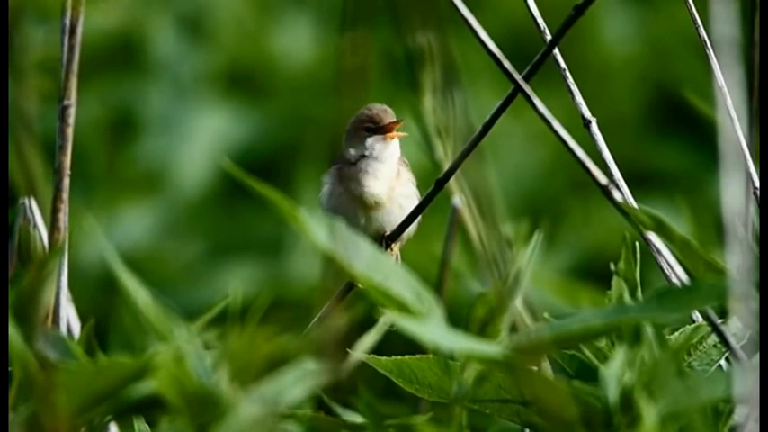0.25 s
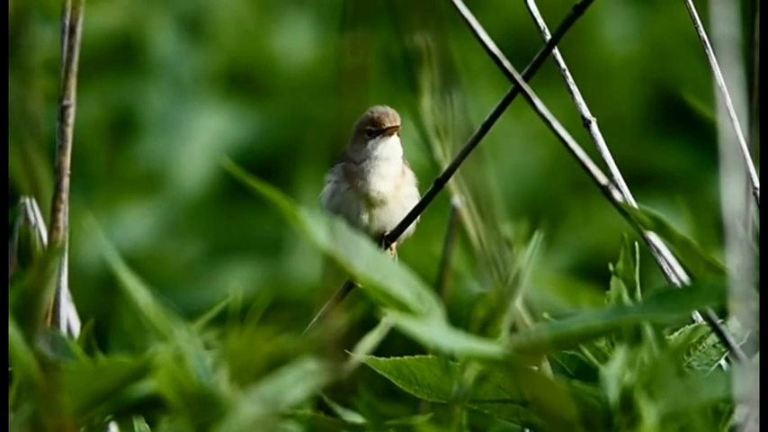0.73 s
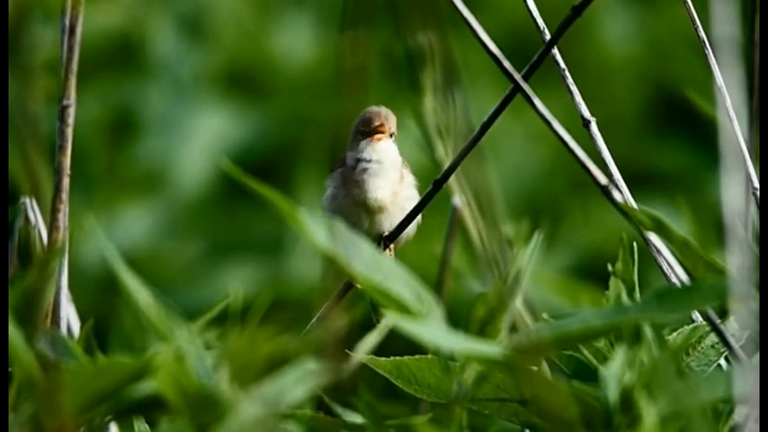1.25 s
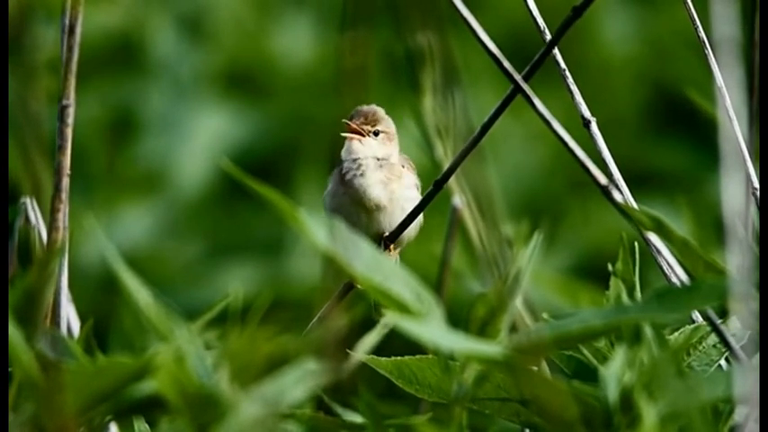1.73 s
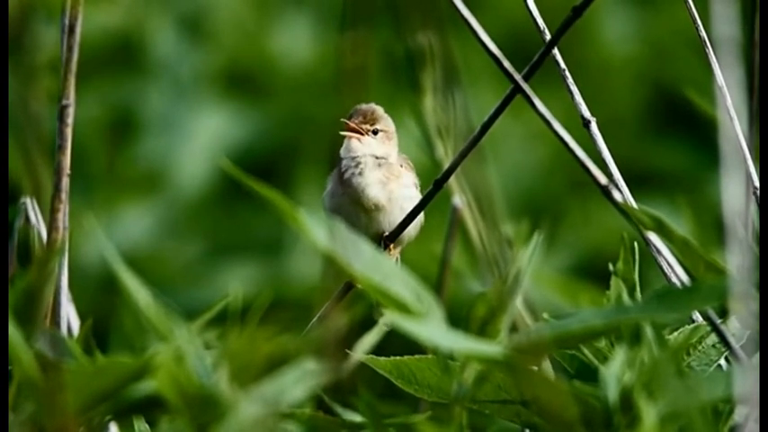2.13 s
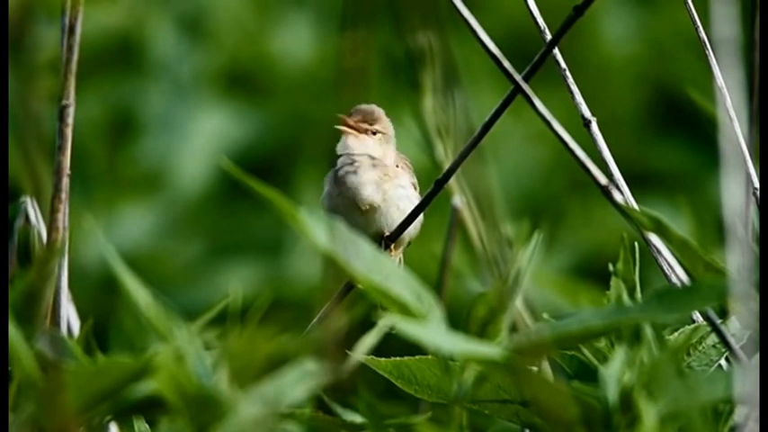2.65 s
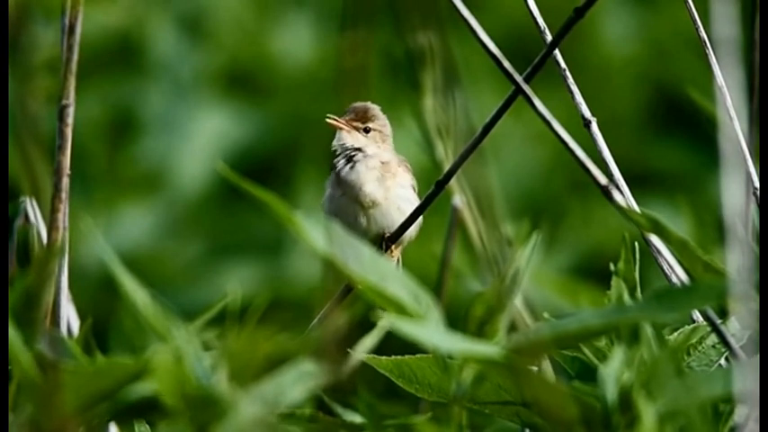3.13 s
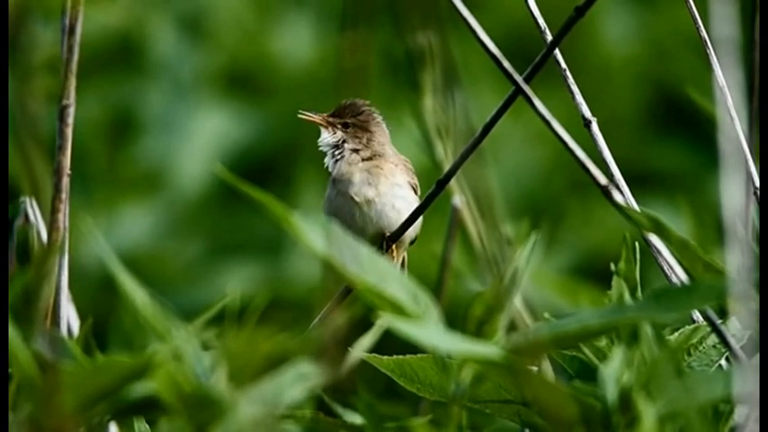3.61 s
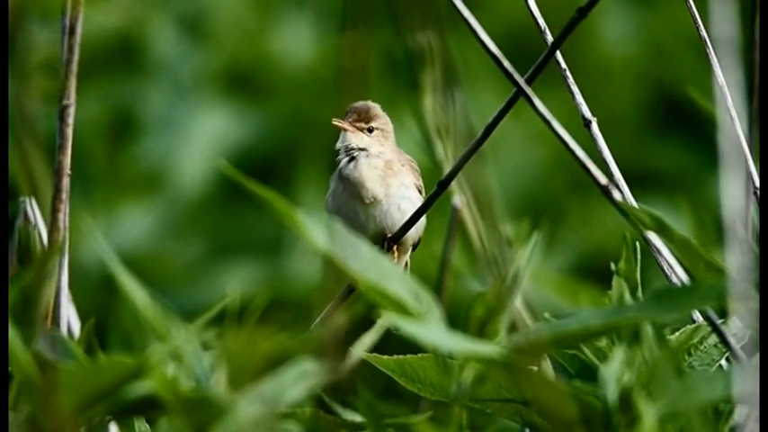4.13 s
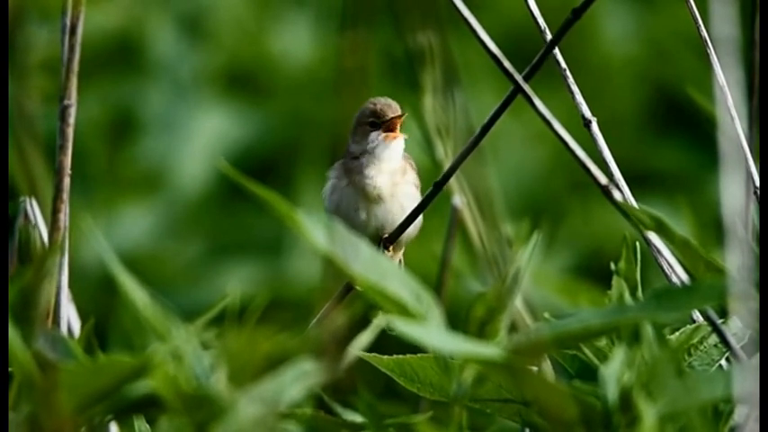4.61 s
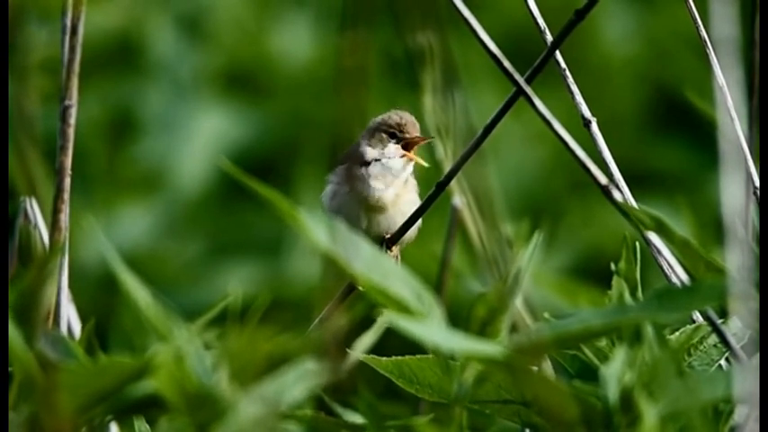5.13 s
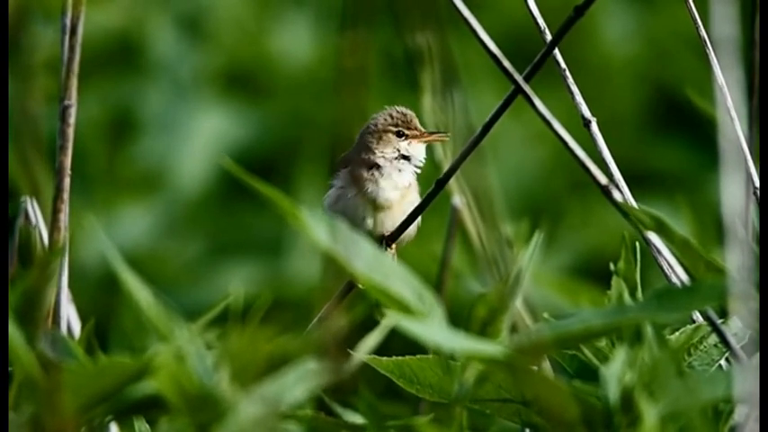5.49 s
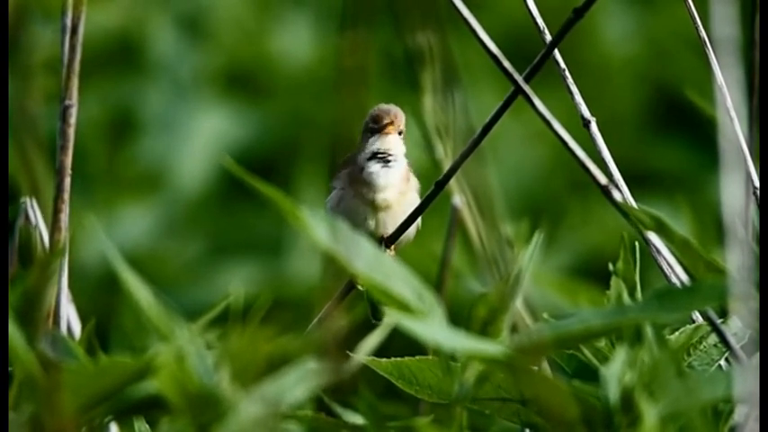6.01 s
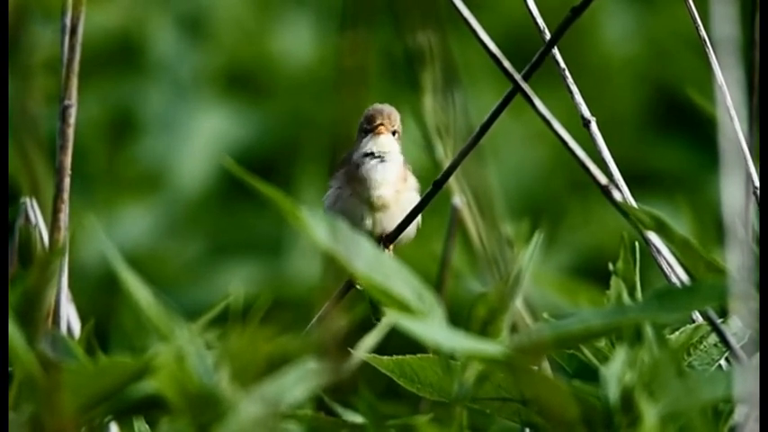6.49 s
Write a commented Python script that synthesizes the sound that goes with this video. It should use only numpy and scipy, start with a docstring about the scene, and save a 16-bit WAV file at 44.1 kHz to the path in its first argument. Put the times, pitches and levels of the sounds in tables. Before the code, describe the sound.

Open-air stereo pickup of a warbler in vegetation, clear and dry with only a brief diffuse tail from the reeds. A quick quivering trill drops, a series of piercing whistles follows and quickens, then the song turns into quiet squeaky pips, mews and murmurs, punctuated by loud clicking notes, a harsh nasal buzz and steep chips. Other birds whistle faintly far away over a steady soft rumble, a faint engine-like drone and airy leaf hiss.

```python
"""A soft far hoot and a few quiet notes sound over distant rumble and faint foliage hiss; then a warbler sings.
Its song is a falling trill, eight whistles that each open with a rasp, then soft chatter between sharp chips
and one nasal buzz. Each note is a gliding syrinx tone, clean or fluttering, shaped by throat and beak;
the bird repeats a few syllable shapes. Far birds whistle thinly, and reeds scatter every song into a short
tail of decaying noise. Rumble and hiss are shaped noise, drone and hoot plain sines."""
import sys
import numpy as np
from scipy import signal
from scipy.fft import rfft, irfft, next_fast_len
from scipy.io import wavfile
from scipy.ndimage import map_coordinates

SR = 44100
rng = np.random.default_rng(int(sys.argv[2]) if len(sys.argv) > 2 else 0)


def persist_wave(psi):
    """Save psi, clipped to +-1, as 16-bit WAV."""
    counts = np.round(np.clip(psi, -1, 1) * 32767).astype(np.int16)
    wavfile.write(sys.argv[1], SR, np.atleast_2d(counts).T)


N = 297675  # samples, 6.75 s


def undb(db):
    """Decibels to gain."""
    return 10 ** (np.asarray(db) / 20)


def unit(x):
    """Scale to rms 1."""
    return x / np.sqrt(np.mean(x ** 2) + 1e-20)


def response(points, hz):
    """Gain at hz of a (f/Hz, level/dB) curve, straight over log frequency."""
    f, db = np.transpose(points)
    return undb(np.interp(np.log(np.maximum(hz, 1)), np.log(f), db))


def colour(x, points):
    """Filter by a (f/Hz, level/dB) curve in the spectrum, with no phase shift."""
    size = next_fast_len(x.shape[-1] + 512)
    gain = response(points, np.fft.rfftfreq(size, 1 / SR))
    return irfft(rfft(x, size) * gain, size)[..., :x.shape[-1]]


def wander(size, rate):
    """Smooth chance with spread about 1 and `rate` new values a second."""
    at = np.arange(size) * rate / SR
    values = rng.standard_normal(size + 4)
    return map_coordinates(values, [at + 1], order=2, prefilter=False) / .75


def edges(size, rise_s, fall_s):
    """Rounded start and stop."""
    t = np.arange(size) / SR
    ramp = np.minimum(t / rise_s, t[::-1] / fall_s)
    return np.sin(np.pi / 2 * np.clip(ramp, 0, 1)) ** 2


def add(out, s, x):
    """Mix x in at time s."""
    i = max(int(s * SR), 0)
    out[i:i + len(x)] += x[:len(out) - i]


# spectrum of the outdoor noise before its low and high parts are levelled: f/Hz, level/dB
AIR_SPECTRUM = [(15, -44), (25, 3), (101, 4), (202, -6.5), (274, -14.5), (979, -15.5), (1360, -21),
                (2160, -22.5), (2580, -28), (3000, -21), (4510, -21), (6780, -29), (7700, -34.5),
                (8530, -31), (11000, -32.5), (14300, -100), (22000, -120)]
# level of the distant rumble over time: t/s, level/dB
RUMBLE_LEVEL = [(0, -50.5), (1.6, -53), (5.2, -52), (6.3, -50)]
# drone of a distant engine: centre f/Hz, mean level/dB
ENGINE_DRONE = [(98, -61), (199, -67)]


def background(alike_hz=450, sway_db=0.2, hiss_db=-53.5):
    """Distant rumble and drone, alike in both ears, under a wide, gently swaying foliage hiss."""
    mid, side = colour(rng.standard_normal((2, N)), AIR_SPECTRUM)
    # thin out the stereo difference in the bass
    side = signal.sosfilt(signal.butter(1, alike_hz, "high", fs=SR, output="sos"), side)
    air = mid + 0.9 * side * np.array([[1], [-1]])
    low = signal.sosfiltfilt(signal.butter(2, 300, fs=SR, output="sos"), air)
    rumble_db = np.interp(np.arange(N) / SR, *np.transpose(RUMBLE_LEVEL))
    rumble = undb(rumble_db) * unit(low)
    hiss = undb(hiss_db + sway_db * wander(N, 3.2)) * unit(air - low)
    out = rumble + hiss
    for hz, db in ENGINE_DRONE:
        level = undb(db + 1.9 * wander(N, 4))
        pitch = hz * (1 + 0.032 * wander(N, 11))
        out = out + level * unit(np.sin(2 * np.pi * np.cumsum(pitch) / SR))
    return out


# one faint far hoot: t/s, length/s, f/Hz, level/dB
FAR_HOOT = (0, 0.16, 554.5, -54.5)


def hoot():
    """One soft low tone from far away, a plain sine with rounded ends."""
    out = np.zeros(N)
    s, length, hz, db = FAR_HOOT
    t = np.arange(int(length * SR)) / SR
    tone = np.sin(2 * np.pi * hz * t) * edges(len(t), 0.048, 0.1)
    add(out, s, undb(db) * unit(tone))
    return out


# throat and open beak response: f/Hz, level/dB
THROAT = [(900, -21), (1500, 6), (2100, 1), (2600, -8), (3200, 3.5), (4500, -3.5), (6300, 0), (7200, -6.5),
          (8500, -4), (11000, -15)]


def syrinx(hz, rough, throat=THROAT, slope=1.75, jitter=0.2265, flutter_hz=1000, flutter=1.92, overtone_db=5):
    """A membrane tone with overtones; when rough its pitch scatters and the second membrane chops it."""
    size = len(hz)
    pitch = hz * (1 + jitter * rough ** 2 * wander(size, 1688.3))
    phase = 2 * np.pi * np.cumsum(pitch) / SR
    # harmonics 2 to 9, weaker as they climb and silent from 12 kHz
    overtones = sum(np.sin(k * phase) * k ** -slope * (k * hz < 12000) for k in range(2, 10))
    chop_rate = flutter_hz * (1 + 0.163 * wander(size, 416))
    chop = np.sin(2 * np.pi * np.cumsum(chop_rate) / SR)
    tone = np.sin(phase) + undb(overtone_db * rough) * overtones
    return unit(colour(tone * np.exp(flutter * rough ** 2 * chop), throat))


def glide(start_hz, end_hz):
    """Start, middle and end pitch of an even glide."""
    return start_hz, np.sqrt(start_hz * end_hz), end_hz


def held(t, first_hz, hz, settle_s, sag_hz, sag_s):
    """Pitch of a held note: it settles from its first pitch and sags as the pressure ends."""
    return hz + (first_hz - hz) * np.exp(-t / settle_s) - sag_hz * np.exp((t - t[-1]) / sag_s)


def note(length, pitches, rough, throat, slope, rise, fall, swell_db=0, jitter=.22):
    """One arched glide through three pitches, rms 1; rise and fall are shares of its length."""
    u = np.linspace(0, 1, int(max(length, .004) * SR))
    hz = np.polyval(np.polyfit([0, .5, 1], pitches, 2), u)
    tone = syrinx(hz, np.clip(rough, 0, 1), throat, slope, jitter)
    return unit(tone * undb(swell_db * u) * edges(len(u), rise * length, fall * length))


# response with the beak nearly closed: f/Hz, level/dB
MUTED_THROAT = [(900, -26), (1400, 0.5), (2100, 0), (2600, -1.5), (3200, 6.5), (4300, 2.5), (5200, 1),
                (6300, -5.5), (7500, -15.5), (11000, -12.5)]


def muted_note(length, pitches, db, rough, slope=1.58, swell_db=0):
    """A quiet note that swells and fades through a nearly closed beak."""
    return undb(db) * note(length, pitches, rough, MUTED_THROAT, slope, rise=.22, fall=.22, swell_db=swell_db)


# thin whistles of birds further off: t/s, length/s, start f/Hz, end f/Hz, level/dB, roughness 0-1
FAR_NOTES = [(0.222, 0.15, 4550, 4200, -50, 0.38), (.283, 0.094, 2880, 2860, -54.5, 0.32),
             (0.77, 0.081, 4580, 5900, -53, 0.35), (1.226, 0.073, 4900, 6240, -49.5, 0.45),
             (1.235, 0.04, 7300, 6150, -53.5, 0.5), (1.691, 0.028, 2910, 3010, -49, 0.7),
             (1.905, .143, 3060, 2960, -45.5, .3), (2.244, 0.15, 2900, 2798, -50, 0.4),
             (3.006, 0.06, 3450, 3870, -52, 0.5), (3.475, 0.081, 3266, 3050, -50, 0.2),
             (3.883, .052, 3090, 3150, -51, 0.2), (3.954, 0.077, 3670, 3800, -53, 0.3),
             (4.101, 0.051, 4540, 3790, -53.5, .1), (4.19, 0.09, 5750, 6610, -55.5, .43),
             (4.873, 0.056, 2890, 3200, -55, 0), (5.188, 0.071, 3115, 3150, -56, 0.26),
             (6.076, 0.051, 6550, 6700, -56.5, 0.37), (6.26, 0.1, 4560, 5030, -57, 0.7),
             (6.36, 0.044, 4700, 4600, -53.5, 0.3), (6.408, 0.036, 6340, 6580, -55.5, 0.33),
             (6.622, 0.087, 2835, 2690, -54, 0.35)]


def neighbours(bow=0.0248, slope=2.6):
    """Thin, slightly arched whistles of birds further off, made by the same syrinx model."""
    out = np.zeros(N)
    for s, length, start_hz, end_hz, db, rough in FAR_NOTES:
        pitches = start_hz, (1 + bow) * (start_hz + end_hz) / 2, end_hz
        add(out, s, muted_note(length, pitches, db, rough, slope))
    return out


def twitter(count=30, start_s=3.2, db=-56, length=0.0286, low_hz=1700, high_hz=4200, sweep=0.305):
    """Faint scratchy slips of song at random pitches, one in each equal slot under the chatter."""
    out = np.zeros(N)
    for k, (when, height, bend) in enumerate(rng.random((count, 3))):
        hz = low_hz * (high_hz / low_hz) ** height
        end_hz = hz * (1 + sweep * (2 * bend - 1))
        s = start_s + (k + when) / count * (N / SR - start_s)
        add(out, s, muted_note(length, glide(hz, end_hz), db, rough=0.477))
    return out


# murmured syllables between the louder notes: t/s, length/s, f/Hz, level/dB, roughness 0-1
MURMURS = [(4.039, 0.11, 1986, -52, 0.64), (4.156, 0.07, 2012, -48, 0.42),
           (4.294, 0.024, 1930, -47.5, 0.58), (4.932, .075, 984, -49.5, 0.3),
           (4.994, 0.037, 1007, -49.5, 0.42), (5.548, 0.051, 2223, -50, 0.64),
           (5.592, .061, 2070, -48, 0.5), (5.652, 0.052, 2026, -51, 0.54),
           (5.733, 0.028, 2047, -51.5, 0.47), (6.195, 0.019, 1880, -45, 0.48),
           (6.226, 0.018, 1857, -48, 0.39), (6.476, .06, 1077, -53.5, 0.14),
           (6.542, 0.043, 999, -48.5, 0.48), (6.611, 0.027, 2055, -49.5, 0.64)]


def murmurs(slope=1.9, rise=0.052, arch=0.109):
    """Low syllables that all share one slightly rising arch of pitch."""
    out = np.zeros(N)
    for s, length, hz, db, rough in MURMURS:
        pitches = hz * (1 + np.array([-rise - arch / 2, arch / 2, rise - arch / 2]))
        add(out, s, muted_note(length, pitches, db, rough, slope))
    return out


# quick pips of the chatter: t/s, middle f/Hz, glide over the pip/octaves, level/dB
PIPS = [(3.269, 3440, -0.81, -36.5), (3.314, 3120, 0.37, -36), (3.33, 2910, 0.18, -38),
        (3.344, 4990, 1, -35.5), (3.359, 3155, 0.078, -34), (3.38, 4730, 0.081, -38),
        (3.393, 2900, 0.14, -41.5), (3.411, 3890, 0.33, -36.5), (3.448, 3080, 0.14, -43),
        (3.465, 1890, -.1, -48.5), (3.733, 3660, -0.94, -38), (3.757, 1970, 0.64, -43.5),
        (3.774, 3470, 0.25, -37), (3.789, 2820, 0.12, -38.5), (3.803, 3860, -0.22, -36),
        (3.853, 1847, -0.056, -43.5), (4.521, 4840, 0.32, -34)]
PIP_S = .013
# low mews and scratches: t/s, length/s, start f/Hz, end f/Hz, level/dB, roughness 0-1
MEWS = [(0.175, 0.013, 1825, 3390, -49, 0.82), (0.192, 0.025, 2390, 1906, -44, 0),
        (0.737, 0.02, 2120, 2390, -47, 0.94), (0.758, 0.0295, 2336, 2277, -45.5, 0.42),
        (0.979, 0.073, 2340, 2064, -46, 0.72), (1.481, 0.064, 2120, 2155, -50.5, 0.69),
        (2.613, 0.05, 2100, 2100, -45.5, 0.84), (2.906, 0.046, 3210, 3190, -50, 0.72),
        (2.954, 0.035, 3970, 3600, -37, 0.91), (4.208, .078, 3134, 2850, -48, 0.87),
        (4.595, 0.023, 4200, 2090, -42.5, 0.6), (4.64, 0.032, 1753, 2880, -42.5, 0.45),
        (5.063, .029, 3540, 1633, -43, 0.38), (5.104, 0.037, 2020, 3210, -39.5, 0.32),
        (6.083, 0.019, 2455, 1780, -43.5, 0.53), (6.119, 0.052, 1712, 2525, -43, 0.32),
        (6.159, 0.023, 2210, 1815, -42, 0.55)]


def chatter():
    """Quick gliding pips and mostly longer, lower mews through a nearly closed beak."""
    out = np.zeros(N)
    for s, hz, octaves, db in PIPS:
        half = 2 ** (octaves / 2)
        add(out, s, muted_note(PIP_S, glide(hz / half, hz * half), db, rough=0.45))
    for s, length, start_hz, end_hz, db, rough in MEWS:
        add(out, s, muted_note(length, glide(start_hz, end_hz), db, rough))
    return out


# response with the beak half open, shared by turns and buzz: f/Hz, level/dB
HALF_OPEN_THROAT = [(900, -38), (2100, -15.5), (3200, -17), (4300, -3.5), (5400, 1.5), (6400, -12),
                    (7300, -22), (8500, -23), (11000, -26)]
# soft three-part turns: t/s, length of the dip/s, f at its bottom/Hz, level of the dip/dB
TURNS = [(3.162, .039, 2205, -40.5), (3.625, 0.037, 2100, -42.5), (4.478, .04, 2070, -43.5),
         (5.955, .044, 2030, -44)]
# flick pitches at start, middle, end
FLICK_S, FLICK_UP_HZ, FLICK_DOWN_HZ = .013, (1720, 2720, 2870), (4560, 3600, 2330)


def turns(rim=1.22, up_db=4, down_db=6, flick_rough=0.51, swell_db=4, slope=1.15):
    """The voice flicks up, dips through a low note whose octave rings the half-open beak, and flicks down."""
    out = np.zeros(N)
    for s, length, hz, db in TURNS:
        dip_hz = (rim * hz, hz, rim * hz)
        dip = note(length, dip_hz, .33, HALF_OPEN_THROAT, slope, rise=.2, fall=.15, swell_db=swell_db)
        add(out, s, muted_note(FLICK_S, FLICK_UP_HZ, db + up_db, flick_rough, swell_db=8))
        add(out, s + FLICK_S, undb(db) * dip)
        add(out, s + FLICK_S + length, muted_note(FLICK_S, FLICK_DOWN_HZ, db + down_db, flick_rough))
    return out


def open_note(length, pitches, db, rough, swell_db, rise=0.099, jitter=0.21, rasp_db=-24, slope=2.96, leak_db=-9):
    """A sharp note through the open beak, with a thin rush of air that grows with pitch."""
    x = note(length, pitches, rough, THROAT, slope, rise=rise, fall=.08, swell_db=swell_db, jitter=jitter)
    hiss = colour(rng.standard_normal(len(x)), [(1200, -35), (2000, leak_db), (3500, 12.5), (11000, -2.0)])
    rush = abs(x) * hiss  # the air follows the tone's own waveform
    return undb(db) * (x + undb(rasp_db) * (pitches[1] / 4000) ** 2 * rush)


# the nasal buzz; its level is before the opening accent
BUZZ_START_S, BUZZ_S, BUZZ_DB = 5.251, 0.16, -40
BUZZ_FIRST_HZ, BUZZ_HZ, BUZZ_SETTLE_S, BUZZ_SAG_HZ, BUZZ_SAG_S = 900, 1086, .028, 280, .005
# the harsh burst that opens it, pitches at start, middle, end
BURST_S, BURST_HZ, BURST_DB = .053, (6140, 5910, 5830), -22.5


def buzz(slope=.3, air_db=-12, rough=0.36, accent_db=7, accent_s=.045):
    """A low voice with air, whose fourth and fifth harmonics ring the beak; it starts harsh and clears."""
    out = np.zeros(N)
    t = np.arange(int(BUZZ_S * SR)) / SR
    hz = held(t, BUZZ_FIRST_HZ, BUZZ_HZ, BUZZ_SETTLE_S, BUZZ_SAG_HZ, BUZZ_SAG_S)
    hz = hz * (1 + 0.0073 * wander(len(t), 197))
    voice = syrinx(hz, rough, HALF_OPEN_THROAT, slope, jitter=.1)
    air = unit(colour(rng.standard_normal(len(t)), HALF_OPEN_THROAT))
    level = undb(BUZZ_DB + accent_db * np.exp(-t / accent_s)) * edges(len(t), 0.0038, 0.0031)
    burst = open_note(BURST_S, BURST_HZ, BURST_DB, rough=0.66, swell_db=-11, rise=0.19, jitter=0.069)
    add(out, BUZZ_START_S, (voice + undb(air_db) * air) * level)
    add(out, BUZZ_START_S, burst)
    return out


# chips, steep sweeps down through the whole voice: t/s, level/dB
CHIPS = [(4.371, -25), (5.827, -21), (6.694, -20.5)]
CHIP_S, CHIP_HZ = .031, (7790, 5190, 3060)
# dry ticks: t/s, length/s, level/dB, swell over the note/dB
TICKS = [(2.941, 0.0089, -29, -7), (4.026, .013, -26, -26), (4.763, .013, -25.5, 13.5),
         (5.45, 0.0144, -24, -26), (6.338, 0.0089, -23, -19)]
TICK_HZ = (5877, 5550, 5080)
# loud slurs, up into the trill and down after the whistles:
# t/s, length/s, start f/Hz, end f/Hz, level/dB, roughness 0-1, swell over the note/dB
SLURS = [(.347, 0.033, 5730, 6850, -32.5, 0.29, -6), (0.356, .026, 2980, 3670, -36, 0.26, 19),
         (0.377, .02, 3850, 6450, -32.5, .2, 0), (3.054, .044, 5990, 4130, -30, 0.36, 10),
         (3.093, 0.014, 6840, 4510, -24.5, 0.54, -15)]


def chips():
    """The sharp notes: chips that peak early in their downward sweep, rough ticks and a few slurs."""
    out = np.zeros(N)
    for s, db in CHIPS:
        add(out, s, open_note(CHIP_S, CHIP_HZ, db, rough=0.46, swell_db=-35.5, rise=0.6, jitter=0.17))
    for s, length, db, swell_db in TICKS:
        add(out, s, open_note(length, TICK_HZ, db, rough=.7, swell_db=swell_db, rise=0.3))
    for s, length, start_hz, end_hz, db, rough, swell_db in SLURS:
        add(out, s, open_note(length, glide(start_hz, end_hz), db, rough, swell_db))
    return out


# whistle calls: t/s, length of the held tone/s, its first f/Hz, its settled f/Hz,
# rasp level/dB, scoop level/dB, held tone level before its accent/dB
WHISTLES = [(1.069, .375, 4100, 4470, -29, -31.5, -38), (1.588, 0.16, 4070, 4320, -26.5, -29, -35),
            (1.853, .102, 4085, 4365, -27.5, -28, -37), (2.037, 0.096, 3900, 4320, -28.5, -29, -36.5),
            (2.202, .1, 4200, 4310, -31, -26, -34.5), (2.377, 0.087, 4410, 4410, -27.5, -25.5, -35.5),
            (2.555, 0.099, 4030, 4204, -32.5, -27.5, -38.5), (2.748, 0.089, 3970, 4160, -32, -26, -35.5)]
# a rising rasp and a low scoop lead to the held tone; pitches at start, middle, end
RASP_S, RASP_HZ = .022, (4864, 5570, 6480)
SCOOP_DELAY_S, SCOOP_S, SCOOP_HZ = .013, .029, (3318, 3492, 3853)
# the held tone: opening accent, settling and sagging pitch, release
ACCENT_DB, ACCENT_S, SETTLE_S, SAG_HZ, SAG_S, RELEASE_S = 7, .035, .035, 380, .016, .021


def whistles(rough=0.17, slope=3.58, waver_db=1.5):
    """Each call is a rasp, a swelling scoop, then a nearly pure held tone with a slight tremor."""
    out = np.zeros(N)
    for s, length, first_hz, settled_hz, rasp_db, scoop_db, tone_db in WHISTLES:
        add(out, s, open_note(RASP_S, RASP_HZ, rasp_db, rough=.85, swell_db=-3, rise=0.23, jitter=.1))
        add(out, s + SCOOP_DELAY_S, open_note(SCOOP_S, SCOOP_HZ, scoop_db, rough=0.3, swell_db=15))
        t = np.arange(int(length * SR)) / SR
        hz = held(t, first_hz, settled_hz, SETTLE_S, SAG_HZ, SAG_S)
        hz = hz * (1 + 0.0057 * wander(len(t), 114.3))
        db = tone_db + ACCENT_DB * np.exp(-t / ACCENT_S) + waver_db * wander(len(t), 50)
        tone = syrinx(hz, rough, slope=slope) * undb(db) * edges(len(t), 0.0016, RELEASE_S)
        add(out, s + SCOOP_DELAY_S + SCOOP_S, tone)
    return out


# the falling trill: its centre pitch drops steadily while the vibrato narrows and slows
TRILL_START_S, TRILL_S, TRILL_DB, TRILL_FADE_DB_PER_S = 0.4022, 0.22, -23.5, -41.5
TRILL_HZ, TRILL_FALL_HZ_PER_S = 6626, 11280
VIBRATO_DEPTH_HZ, VIBRATO_NARROW_S = 900, 0.15
VIBRATO_FIRST_HZ, VIBRATO_LAST_HZ, VIBRATO_SLOW_S = 76.2, 56.7, 0.063


def trill(rough=0.046, quiver=0.017, dwell=0.32, trough_db=4.5):
    """A falling whistle whose fast vibrato slows and narrows, lingering and loudest in the troughs."""
    out = np.zeros(N)
    t = np.arange(int(TRILL_S * SR)) / SR
    rate = VIBRATO_LAST_HZ + (VIBRATO_FIRST_HZ - VIBRATO_LAST_HZ) * np.exp(-t / VIBRATO_SLOW_S)
    turn = 2 * np.pi * np.cumsum(rate) / SR
    # the double-rate term flattens the troughs and sharpens the peaks
    shape = np.sin(turn) - dwell * np.cos(2 * turn)
    swing = VIBRATO_DEPTH_HZ * np.exp(-t / VIBRATO_NARROW_S) * shape
    centre = (TRILL_HZ - TRILL_FALL_HZ_PER_S * t) * (1 + quiver * wander(len(t), 597.0))
    db = TRILL_DB + TRILL_FADE_DB_PER_S * t - trough_db * swing / VIBRATO_DEPTH_HZ
    level = undb(db) * edges(len(t), 0.057, 0.028)
    add(out, TRILL_START_S, syrinx(centre + swing, rough, slope=3.65) * level)
    return out


# direct sound at the two microphone ports, left minus right: f/Hz, level/dB
PORT_BALANCE = [(300, -6), (1400, -8.5), (2200, 3), (3400, 5.5), (4400, 4.5), (4900, -6), (5600, -15),
                (6200, -15.5), (6900, 3), (8200, -2), (9500, 6)]


def reeds(song, near_db=-9, near_t60=0.11, far_db=-16, far_t60=0.22):
    """Close leaves scatter the song at once, the reed bed returns a thin tail; each port hears its own mix."""
    t = np.arange(SR // 2) / SR
    channels = []
    for side in (1, -1):
        tail = 0
        for db, t60, delay in ((near_db, near_t60, .001), (far_db, far_t60, .008)):
            scatter = rng.standard_normal(len(t)) * 1000 ** (-t / t60) * (t > delay)
            tail = tail + undb(db) * scatter / np.linalg.norm(scatter)
        # the two ports share the power of the direct sound differently at each pitch
        share = [(hz, 10 * np.log10(2 / (1 + undb(-side * db) ** 2))) for hz, db in PORT_BALANCE]
        channels.append(colour(song, share) + signal.fftconvolve(song, tail)[:N])
    return np.array(channels)


def scene():
    """The singer and its neighbours among the reeds; soft and distant notes scatter more than the loud ones."""
    air = background() + hoot()
    loud = reeds(trill() + whistles() + chips() + buzz())
    soft_song = turns() + chatter() + murmurs() + twitter()
    soft = reeds(soft_song, near_db=-4, near_t60=.13, far_db=-9, far_t60=.24)
    far = reeds(neighbours(), near_db=1.5, near_t60=.15, far_db=-13, far_t60=.35)
    return loud + soft + far + air


# narrow dips of the microphone: f/Hz, width/Hz
MIC_DIPS = [(2590, 157), (7750, 930)]
LOW_CUT_HZ, TOP_HZ = 27, 11050


def record(dry):
    """The microphone has two narrow dips; the recorder cuts the deepest bass and the top."""
    for hz, width in MIC_DIPS:
        dry = signal.lfilter(*signal.iirnotch(hz, hz / width, fs=SR), dry)
    dry = signal.sosfilt(signal.butter(10, LOW_CUT_HZ, "high", fs=SR, output="sos"), dry)
    return signal.sosfilt(signal.ellip(10, .2, 70, TOP_HZ, fs=SR, output="sos"), dry)


dry = scene()
out = record(dry)
persist_wave(out)
```